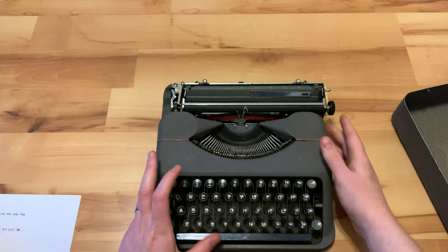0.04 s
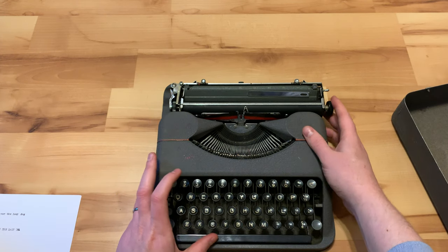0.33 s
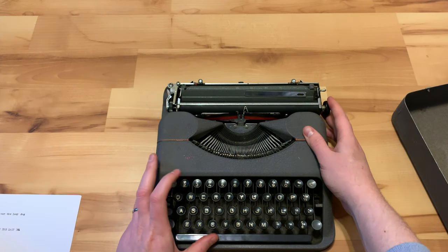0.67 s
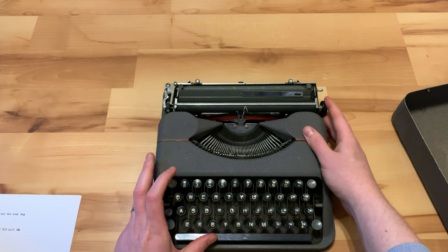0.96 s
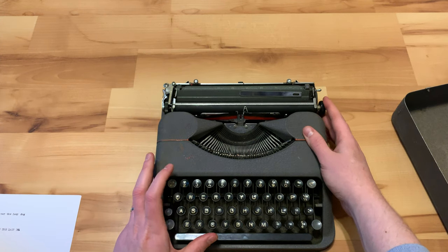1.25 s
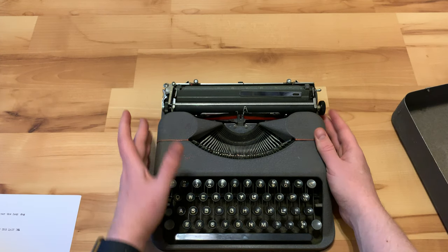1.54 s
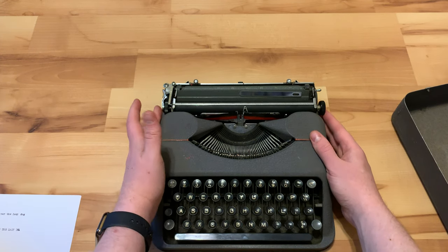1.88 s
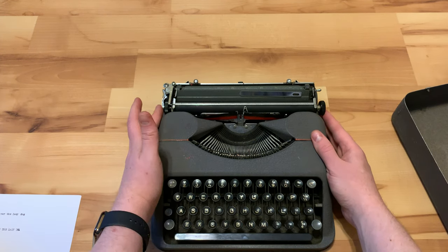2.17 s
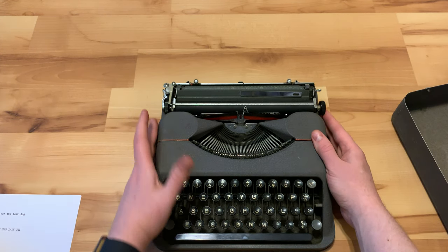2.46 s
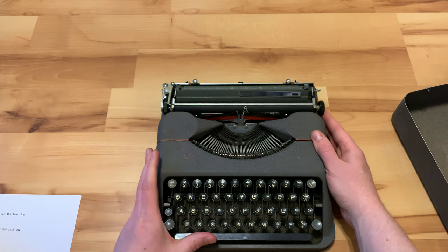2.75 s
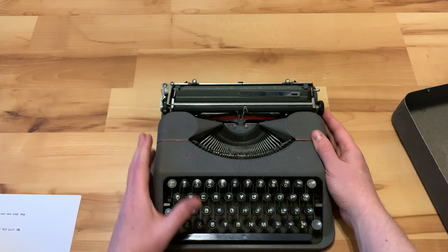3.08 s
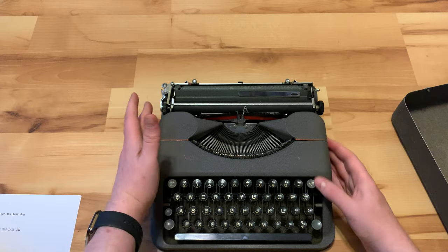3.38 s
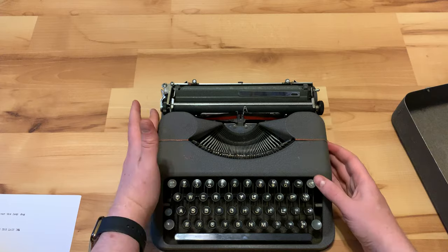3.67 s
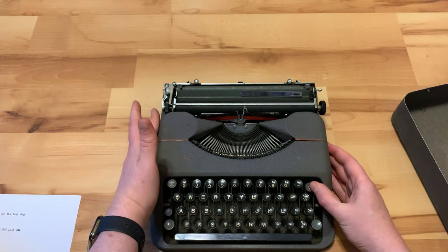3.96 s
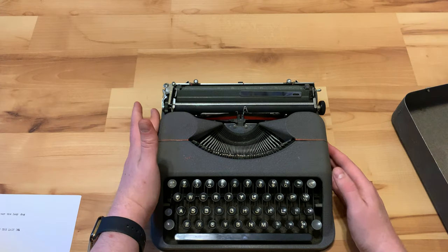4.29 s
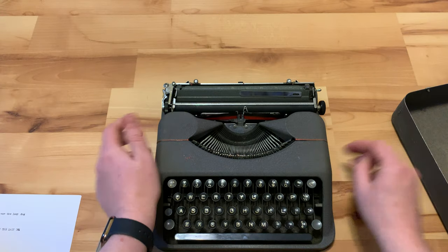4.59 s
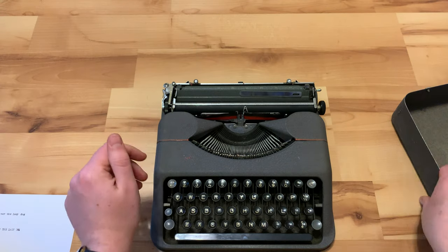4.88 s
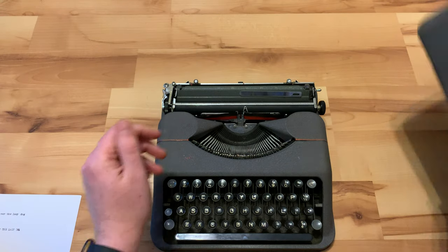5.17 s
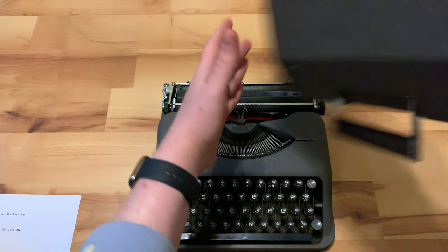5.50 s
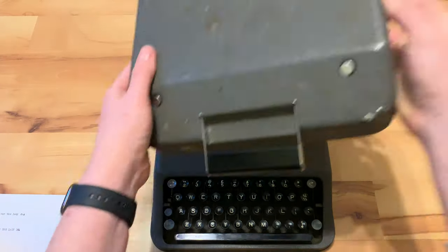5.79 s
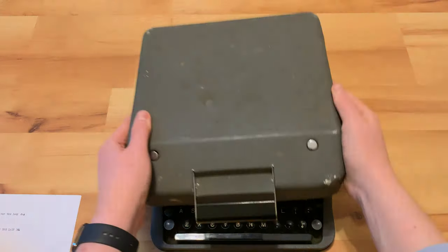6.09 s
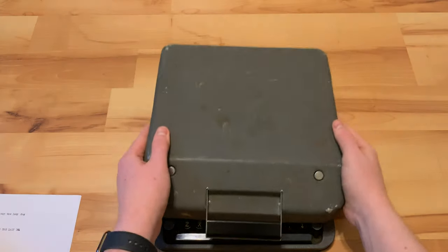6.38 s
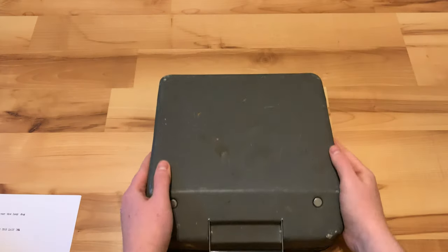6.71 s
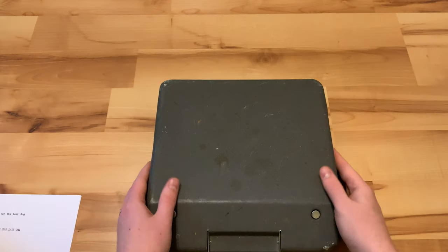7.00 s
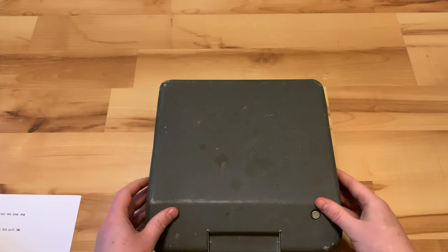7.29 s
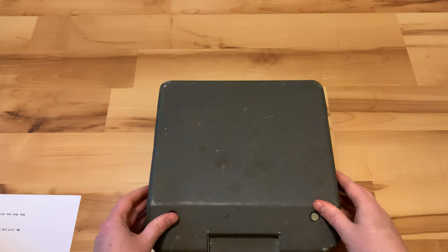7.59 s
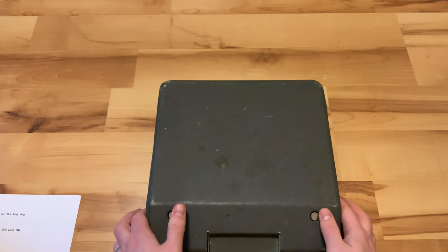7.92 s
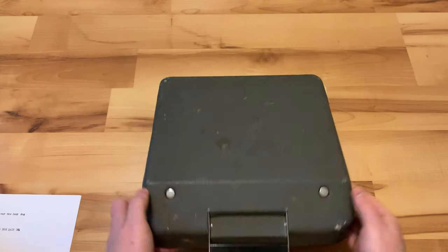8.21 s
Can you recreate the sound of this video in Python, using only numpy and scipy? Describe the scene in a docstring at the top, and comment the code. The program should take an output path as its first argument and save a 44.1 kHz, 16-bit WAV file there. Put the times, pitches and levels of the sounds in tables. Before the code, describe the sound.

From the start to about 1.3 seconds, a portable typewriter's carriage is pushed over its ratchet: seven small steel clicks with a light grainy scrape. Faint finger taps and rubbing follow. Lock levers snap twice near 2.8 seconds and several more times around 4 seconds. From 5 to 5.9 seconds a sheet-metal lid is lifted, its handle clattering against it in two loud, bright, ringing bursts. From 6.3 to 7 seconds the lid knocks hollowly on the base, hardest at 6.6, where its rim briefly scrapes down. At 7.5 seconds it gives a tiny creak and drops shut with a loud hollow boom, the wooden table thudding underneath. A few softer knocks and hand rubs come around 8 seconds. Everything sounds close, in a small room with a short echo and a faint low hum and rumble.

```python
"""First comes a run of small steel clicks: a portable typewriter's carriage is pushed over its ratchet,
then levers snap to lock it. The sheet-metal lid is picked up with a rattling handle, scrapes down over
the machine and drops shut with a hollow boom. Each blow makes the metal ring, and the wooden table
thuds underneath. Fingers rub and tap; the small room echoes, and a faint hum lies under it all."""
import sys
import numpy as np
from scipy import signal
from scipy.fft import rfft, irfft
from scipy.io import wavfile
from scipy.ndimage import uniform_filter1d

SR = 44100
rng = np.random.default_rng(int(sys.argv[2]) if len(sys.argv) > 2 else 0)


def master(y):
    """Save y as 16-bit WAV."""
    cut = np.clip(np.atleast_2d(y).T, -1, 1)
    pcm = np.round(cut * 32767)  # scale
    wavfile.write(sys.argv[1], SR, pcm.astype(np.int16))


N = 363825
T = np.arange(N) / SR
RING_SAMPLES, ATTACK_SAMPLES = 10240, 882  # one whole blow; its opening part, which sets its level

# Ratchet teeth passing under the pawl, the little catch that rides over them:
# (time [s], level [dB], snap delay [s], snap level [dB], settling delay [s], settling level [dB])
TEETH = [(0.159, -49, 0.019, -47.5, 0.031, -59.5), (0.274, -35.5, 0.032, -45.5, .074, -48.5),
         (0.431, -34, 0.023, -43, .079, -44), (0.598, -36, .016, -43, 0.058, -45.5),
         (0.75, -37, .012, -42, .073, -44), (0.923, -41, .011, -42, 0.12, -45.5),
         (1.16, -36, .017, -43, 0.027, -50.5)]
# Lock levers snapping over. Bass, treble and tick count up or down from the level, here and below:
# (time [s], level [dB], bass [dB], treble [dB], tick [dB])
LATCHES = [(2.724, -45.5, -7, 8, -8), (2.821, -42.5, -1, 11, -11), (3.871, -59, -8, 5.5, -25),
           (3.927, -40, -11.5, 9.5, -17.5), (3.98, -42, -3, 5.5, -18), (4.105, -36.5, -11.5, 8.5, -10.5)]
# The handle hitting the lifted lid: (time [s], level [dB], bass [dB], treble [dB])
RATTLES = [(4.983, -38.5, -16.5, -8), (5.0, -34.5, -13, -5.5), (5.046, -20, -18, -1.5),
           (5.07, -29, -18, 1.5), (5.109, -25, -16.5, -5), (5.131, -23, -16, -4), (5.185, -33, -14, 0),
           (5.408, -51, -4, -15), (5.474, -40, -9, -13.5), (5.517, -35.5, -1.5, -11),
           (5.604, -28, -0.5, -7.5), (5.613, -17, -7, -1.5), (5.635, -20, -12, 5.5), (5.655, -22, -7, 1),
           (5.706, -22, -9, -2), (5.736, -17.5, -22, -1), (5.756, -17.5, -13, 2.5), (5.779, -19, -5, 1),
           (5.883, -29, -12.5, -5.5), (5.906, -40, 3, 1)]
# The lid knocking on the base, then fingers on it: (time [s], level [dB], bass [dB], treble [dB])
KNOCKS = [(6.279, -27.5, -0.5, -4), (6.377, -37.5, 2, -5), (6.47, -27, 0, -13.5), (6.588, -35, -1, -12),
          (6.622, -18.5, 8.5, -7.5), (6.803, -29.5, 8.5, -6.5), (6.984, -56.5, 20.5, -2),
          (7.001, -31.5, -4, -10), (7.01, -32.5, 8, -18), (7.866, -48, 14, -7.5), (7.926, -37, 0, -7),
          (7.996, -51, 18, -9), (8.087, -49, 13, -25), (8.212, -66, 20.5, -3.5)]
# Fingertips landing on the frame: (time [s], level [dB], bass [dB], treble [dB])
TAPS = [(1.47, -66, -1, -20), (1.69, -71, 3, -5), (1.94, -73, -14, -23), (2.36, -68.5, -6, -25),
        (3.07, -69, 0, -45), (3.252, -55.5, -2.5, -30), (3.475, -62, -3, -23), (4.575, -53, -8.5, -17)]
# Skin stroking paint and wood: (time [s], length [s], level [dB])
RUBS = [(0.0, 0.11, -69), (1.47, 0.28, -62.5), (2.36, 0.22, -79), (2.63, .07, -65), (3.27, 0.17, -59),
        (4.58, 0.029, -56.5), (4.7, .22, -63), (4.98, 0.66, -57.5), (6.49, 0.14, -59), (7.08, .17, -55),
        (7.83, .04, -59), (8.14, .11, -61.5)]
# Heavier blows reaching the table: (time [s], level [dB])
THUMPS = [(2.727, -47.5), (2.835, -45), (3.983, -47), (5.614, -26), (5.775, -35.5), (6.628, -40.5),
          (7.004, -31.5), (7.513, -21.5), (7.533, -30), (7.993, -37.5)]
# The air under the lid sounds lower as the gap closes: (time [s], pitch [Hz])
AIR_PITCH = [(6.28, 448), (6.62, 391), (6.72, 310), (6.81, 274), (7.0, 280.4), (7.5, 210.5), (8.25, 239)]
# Where the blows fall, as how much sooner the right microphone hears them: (time [s], lead [ms])
RIGHT_LEAD = [(1.2, 0.0077), (4.1, -0.13), (5.1, 0.24), (5.6, 0.014), (6.5, 0.083), (7.5, -0.056),
              (8.0, -0.086)]
# Modes, the tones a struck thing rings with, of frame, free lid and seated lid: (pitch [Hz], level [dB])
FRAME_MODES = [(205, -11), (288, -3.5), (322, -14.5), (410, -13.5), (585, -15), (730, -8), (862, -1.5),
               (945, -1), (1130, -6), (1330, -6), (1540, -9), (1750, -23), (2080, -9), (3420, -9),
               (5440, -10.5)]
FREE_LID_MODES = [(190, -8), (287, -7.5), (380, -9.5), (508, -4.5), (640, -5.5), (675, -6), (902, -5),
                  (1010, -20.5), (1170, -6.5), (1348, -5.5), (1385, 2), (1450, -5.5), (1505, 2.5),
                  (1880, -11.5), (2215, -7.5), (2470, -7.5), (3240, -6), (3750, -10), (3900, -7.5),
                  (4830, -11), (5860, -8.5), (8040, -5.5)]
SEATED_LID_MODES = [(212, -3), (289, -9.5), (381, 1), (436, -19), (530, -14.5), (648, 0), (745, -1.5),
                    (830, -1), (905, -3), (1071, -5.5), (1290, -1.5), (1480, -9.5), (1900, -6.5),
                    (2430, -12), (3710, 0)]
# Modes of the table top; t60 is the time to fade by 60 dB: (pitch [Hz], level [dB], t60 [s])
TABLE_MODES = [(33.4, -9, 0.12), (60.4, -2.5, 0.44), (86, -1.5, 0.26), (137, 1, 0.21), (158, -2, 0.15),
               (218, -5, 0.013)]
# Crowded modes blurring into noise, in steel parts and sheet metal: (pitch [Hz], relative level [dB])
STEEL_NOISE = [(150, 9), (500, -6), (900, 4.5), (1600, 4.5), (2600, -6), (4000, -3), (7000, -4.5),
               (9000, 1.5), (13500, 0), (16000, -3.5)]
SHEET_NOISE = [(150, 10.5), (500, 1), (900, 1), (1500, 4), (2600, -3.5), (4000, 1), (7000, -2), (9000, 3),
               (13500, -2.5), (16000, -11)]
# The hiss of rubbing skin: (pitch [Hz], relative level [dB])
SKIN_NOISE = [(100, 2), (450, -1), (700, -2), (900, 2), (1100, 2.5), (1450, 3), (2000, -4.5),
              (2700, -2), (7000, -8.5), (9500, -5), (15000, -11)]
# Room rumble and hiss: (pitch [Hz], relative level [dB])
ROOM_NOISE = [(12, -34.5), (20, -9.5), (65, -10), (104, -3.5), (177, -17.5), (485, -43), (527, -40.5),
              (1150, -49.5), (16000, -65.5)]

SHUT_S = 7.511  # the moment the lid drops shut


def carriage():
    """Small steel parts click inside the frame and make it ring."""
    return strike(ratchet() + latches(), FRAME_MODES, STEEL_NOISE, modes_db=-8.5, modes_t60=.16,
                  crack_s=.0065, crack_db=1.5, ring_t60=.24, ring_hz=5200, apart_hz=1210, detune=.02)


def ratchet():
    """At every tooth the pawl lifts, strikes, snaps home and bounces; then the carriage settles."""
    dull, bright = (-6.5, -7), (.5, 7.9)  # (bass [dB], treble [dB])
    blows = []
    for s, db, snap_s, snap_db, settle_s, settle_db in TEETH:
        lift = (s - .0099, min(-54, db - 14.5), *bright)
        blows += [lift, (s, db, *dull), (s + settle_s, settle_db, *bright)]
        blows += bounce([(s + snap_s, snap_db, *bright)], gap_s=.013, step_db=-2.5, count=2)
    return blows


def latches():
    """A lever takes up its slack with a tick, snaps over and bounces."""
    ticks = [(s - .024, db + tick_db, bass, treble) for s, db, bass, treble, tick_db in LATCHES]
    return ticks + bounce([row[:-1] for row in LATCHES], gap_s=.0067, step_db=-6, count=2)


def pawl_scrape():
    """Steel drags on steel: a grainy scrape swells towards each tooth and fades after it."""
    grip = uneven_grip(grain_samples=160, spread_db=3.5)
    drags = [(s, settle_s, db - 13.5) for s, db, _, _, settle_s, _ in TEETH]
    swell = strokes(drags, rise_db_per_s=496.5, sag_db_per_s=51, fall_db_per_s=119.5)
    return colour(stereo_noise(N, apart_hz=1200), STEEL_NOISE) * grip * swell


def ping():
    """A small steel part rings with one thin tone as the carriage first moves."""
    out, t = blank_track()
    pitch_hz = 3350
    tone = undb(-53) * np.sin(2 * np.pi * pitch_hz * t) * fade(t, t60=.16)
    place(out, s=.16, sound=[tone, tone])
    return out[:, :N]


def lifted_lid():
    """The free lid rings on as its handle clatters and bounces against it."""
    blows = bounce(RATTLES, gap_s=.011, step_db=-4, count=2)
    return strike(blows, FREE_LID_MODES, SHEET_NOISE, modes_db=-5, modes_t60=.15,
                  crack_s=.01, crack_db=4.5, ring_t60=.32, ring_hz=7000, apart_hz=1800, detune=.004)


def closing_lid():
    """The lid knocks and shuts; the base cuts its ringing short and the air under it booms."""
    slam = bounce([(SHUT_S, -18, 1.5, 2.5)], gap_s=.014, step_db=-3.5, count=4)
    return strike(KNOCKS + slam, SEATED_LID_MODES, SHEET_NOISE, modes_db=-9.5, modes_t60=.1,
                  crack_s=.01, crack_db=-1, ring_t60=.3, ring_hz=3985, apart_hz=1790, detune=.004,
                  air_db=3.5, air_t60=.091)


def sliding_rim():
    """The lid's rim scrapes down over the base, then creaks over the catch just before it shuts."""
    slide = slips(6.64, 6.825, start_db=-40.5, db_per_s=27.5, bass_db=10.3, treble_db=-12, count=16)
    creak = slips(SHUT_S - .041, SHUT_S, start_db=-55.46, db_per_s=596.5,
                  bass_db=12, treble_db=-16, count=4)
    return strike(slide + creak, SEATED_LID_MODES, SHEET_NOISE, modes_db=-15, modes_t60=.12,
                  crack_s=.00376, crack_db=-2, ring_t60=.14, ring_hz=4050, apart_hz=1800, detune=.02,
                  air_db=-1, air_t60=.092)


def slips(start_s, end_s, start_db, db_per_s, bass_db, treble_db, count):
    """Metal sticks and slips at uneven steps, louder as the push grows."""
    delays = (end_s - start_s) * (np.arange(count) + rng.random(count)) / count
    return [(start_s + s, start_db + db_per_s * s, bass_db, treble_db) for s in delays]


def bounce(blows, gap_s, step_db, count):
    """Each blow touches count times, ever weaker, at shrinking and slightly uneven gaps."""
    contacts = []
    for (s, db, *tone), uneven in zip(blows, rng.uniform(-1, 1, (len(blows), count))):
        for k in range(count):
            contacts.append((s, db + k * step_db, *tone))
            s += gap_s * .8 ** k * (1 + .15 * uneven[k])
    return contacts


def strike(blows, modes, noise_shape, modes_db, modes_t60, crack_s, crack_db, ring_t60, ring_hz,
           apart_hz, detune, air_db=None, air_t60=.09):
    """Struck metal gives a sharp crack, a duller noisy ring and clear tones."""
    out, t = blank_track()
    hz, db = np.transpose(modes)
    mode_t60 = modes_t60 * (1000 / hz[:, None]) ** .2  # higher modes die sooner
    waves = np.exp(2j * np.pi * hz[:, None] * t) * fade(t, mode_t60)
    bands = [butter(3, (190, 520), "band"), butter(3, (520, 2600), "band"), butter(3, 2600, "high")]
    dull = butter(1, ring_hz)
    rise = 1 - fade(t, .004)
    usual_db = np.mean([blow[1] for blow in blows])
    for s, blow_db, bass_db, treble_db in blows:
        # each spot that is hit favours other modes; high ones reach the two sides out of step
        gains = undb(modes_db + db + 4 * rng.standard_normal(len(hz))) * rng.choice([-1, 1], len(hz))
        phases = rng.standard_normal((2, len(hz))) * np.minimum(hz / apart_hz, 2) / 2
        tones = (gains * np.exp(1j * phases) @ waves).imag
        if air_db is not None:
            tones = tones + undb(air_db) * np.sin(2 * np.pi * look_up(AIR_PITCH, s) * t) * fade(t, air_t60)
        # grip and contact shift the pitch a little from blow to blow
        stretched = t * (1 + detune * rng.standard_normal())
        tones = np.array([np.interp(stretched, t, side, right=0) for side in tones])
        crack = colour(stereo_noise(RING_SAMPLES, apart_hz, max_width=.23), noise_shape)
        crack *= undb(crack_db + .19 * (blow_db - usual_db))  # harder blows crack more
        crack *= np.exp(-(t / crack_s) ** 2)
        ring = colour(stereo_noise(RING_SAMPLES, apart_hz), noise_shape)
        ring = signal.sosfilt(dull, ring) * fade(t, ring_t60)
        whole = (crack + ring) * rise + tones
        # bass, middle and treble each get their own level
        hit = 0
        for band, offset_db in zip(bands, (bass_db, 0, treble_db)):
            part = signal.sosfilt(band, whole)
            hit += undb(blow_db + offset_db) * part / part[:, :ATTACK_SAMPLES].std()
        place(out, s, hit)
    return out[:, :N]


def table_top():
    """The wooden top thuds under heavy blows, and as the pawl snaps and the carriage settles."""
    out, t = blank_track()
    hz, db, t60 = np.transpose(TABLE_MODES)
    waves = np.sin(2 * np.pi * hz[:, None] * t) * fade(t, t60[:, None])
    jolts = []
    for s, _, snap_s, snap_db, settle_s, settle_db in TEETH:
        jolts += [(s + snap_s / 2, snap_db - 1), (s + settle_s, settle_db - 2.5)]
    for s, thump_db in THUMPS + jolts:
        tilt_db = .54 * (thump_db + 37.5) * np.log2(hz / 100)  # hard blows reach the higher modes
        gains = undb(db + 1.2 * rng.standard_normal(len(hz)) + tilt_db) * rng.choice([-1, 1], len(hz))
        thud = gains @ waves * (1 - fade(t, .023))
        thud *= undb(thump_db) / thud[:2 * ATTACK_SAMPLES].std()
        place(out, s, [thud, thud])
    return out[:, :N]


def fingertips():
    """Soft taps make the frame ring with hardly any crack."""
    return strike(TAPS, FRAME_MODES, STEEL_NOISE, modes_db=3, modes_t60=.11,
                  crack_s=.005, crack_db=-10.5, ring_t60=.1, ring_hz=3000, apart_hz=1190, detune=.02)


def rubbing_hands():
    """Skin drags over the frame in tiny uneven catches."""
    grip = uneven_grip(grain_samples=500, spread_db=2.8)
    swell = strokes(RUBS, rise_db_per_s=346.5, sag_db_per_s=27, fall_db_per_s=245.5)
    return colour(stereo_noise(N, apart_hz=1200), SKIN_NOISE) * grip * swell


def uneven_grip(grain_samples, spread_db):
    """A sliding surface catches and lets go, so its level flickers."""
    grains = uniform_filter1d(rng.standard_normal(N), grain_samples)
    return undb(spread_db * grains / grains.std())


def strokes(rows, rise_db_per_s, sag_db_per_s, fall_db_per_s):
    """Loudness of strokes that swell, sag while they last and die away."""
    t, gain = T[::64], 0
    for s, length_s, db in rows:
        before = rise_db_per_s * np.maximum(s - t, 0)
        during = sag_db_per_s * np.clip(t - s, 0, length_s)
        after = fall_db_per_s * np.maximum(t - s - length_s, 0)
        gain += undb(db - before - during - after)
    return np.interp(T, t, gain)


def room_echo(x, level_db, t60, treble_t60, onset_s):
    """The walls send back a wash of echoes whose treble dies a little sooner."""
    t = np.arange(SR) / SR
    noise = stereo_noise(SR, apart_hz=1100)
    low = signal.sosfilt(butter(1, 3000), noise)
    tail = low * fade(t, t60) + (noise - low) * fade(t, treble_t60)
    tail *= np.clip(t / onset_s - .5, 0, 1)
    tail /= np.sqrt(np.sum(tail ** 2) / 2)
    sent = x - .32 * signal.sosfilt(butter(1, 450), x)  # the bass echoes more weakly
    return undb(level_db) * signal.fftconvolve(sent, tail, axes=1)[:, :N]


def background(rumble_db, hum_db, hum_hz):
    """Low rumble and a slightly wavering hum that fades in and dips once, midway."""
    waver = np.interp(T, np.linspace(0, T[-1], 30), rng.standard_normal(30))
    dip_db = -17 * np.exp(-((T - 4.4) / .78) ** 2)
    fade_in = np.minimum(T / .3, 1) ** 2
    hum = np.sqrt(2) * np.sin(2 * np.pi * hum_hz * T + .25 * waver)
    rumble = colour(stereo_noise(N, apart_hz=1500), ROOM_NOISE)
    return undb(rumble_db) * rumble + undb(hum_db + dip_db) * fade_in * hum


def stereo_noise(size, apart_hz, max_width=1):
    """Noise at two close microphones: alike in the bass, less alike above apart_hz."""
    mid, side = rng.standard_normal((2, size))
    hz = freqs(size)
    width = np.minimum(.13 + hz ** 2 / (hz ** 2 + apart_hz ** 2), max_width)
    side = irfft(rfft(side) * width, size)
    return np.array([mid + side, mid - side]) / np.sqrt(2)


def colour(x, points):
    """Shape a sound by (pitch [Hz], level [dB]) points, then scale it to a strength of 1."""
    hz, db = np.transpose(points)
    size = x.shape[-1]
    gain = undb(np.interp(np.log(freqs(size)), np.log(hz), db))
    shaped = irfft(rfft(x) * gain, size)
    return shaped / shaped.std()


def lean_left(x, db):
    """Make the middle pitches louder on the left than on the right."""
    middle = signal.sosfilt(butter(1, (450, 3000), "band"), x)
    return x + middle * (undb(np.array([[db], [-db]]) / 2) - 1)


def place(out, s, sound):
    """Add a sound at time s; it reaches the nearer microphone first."""
    lead_s = (look_up(RIGHT_LEAD, s) + .03 * rng.standard_normal()) / 1000
    for channel, at in enumerate((s + lead_s / 2, s - lead_s / 2)):
        start = round(float(at) * SR)
        out[channel, start:start + RING_SAMPLES] += sound[channel]


def blank_track():
    """Stereo silence with room for a last ring, and the time steps of one blow."""
    return np.zeros((2, N + RING_SAMPLES)), np.arange(RING_SAMPLES) / SR


def butter(order, hz, kind="low"):
    """A smooth filter that keeps the lows, the highs or a band."""
    return signal.butter(order, hz, kind, fs=SR, output="sos")


def fade(t, t60):
    """Die away by 60 dB every t60 seconds."""
    return np.exp(-np.log(1000) * t / t60)


def look_up(rows, s):
    """A two-column table's value at time s."""
    return np.interp(s, *np.transpose(rows))


def freqs(size):
    """The pitch of each slot in a spectrum, in Hz."""
    return np.maximum(np.arange(size // 2 + 1) * SR / size, 1)


def undb(db):
    """Turn decibels into a multiplier."""
    return 10 ** (np.asarray(db) / 20)


def scene():
    """Machine, hands, lid and table in the small room."""
    machine = lean_left(carriage() + ping() + pawl_scrape() + fingertips() + rubbing_hands(), db=2.5)
    lid = lean_left(lifted_lid() + closing_lid() + sliding_rim(), db=2.5)
    direct = machine + lid + table_top()
    echo = room_echo(direct, level_db=-12.5, t60=.6, treble_t60=.43, onset_s=.0064)
    return direct + echo + background(rumble_db=-54.5, hum_db=-55, hum_hz=102.3)


def record(dry):
    """The microphone openings cut a notch in the treble; the very top is cut off."""
    for notch_hz in (11250, 11600):
        dry = signal.lfilter(*signal.iirnotch(notch_hz, 13, fs=SR), dry)
    top_cut = signal.ellip(6, .2, 70, 15100, fs=SR, output="sos")
    return signal.sosfilt(top_cut, np.clip(dry, -1, 1))


dry = scene()
out = record(dry)
master(out)
```